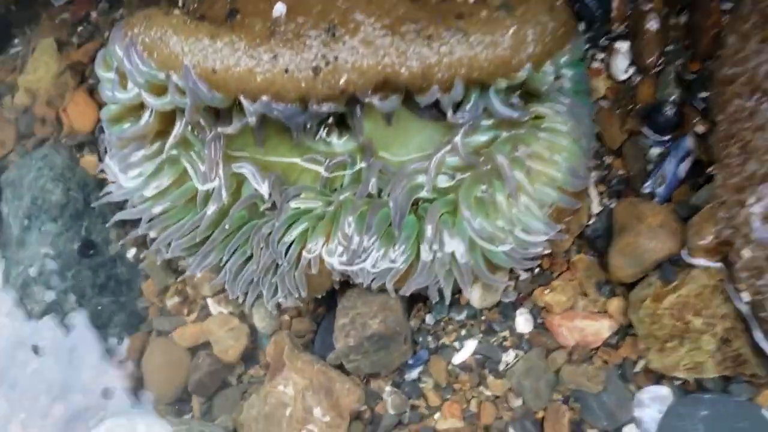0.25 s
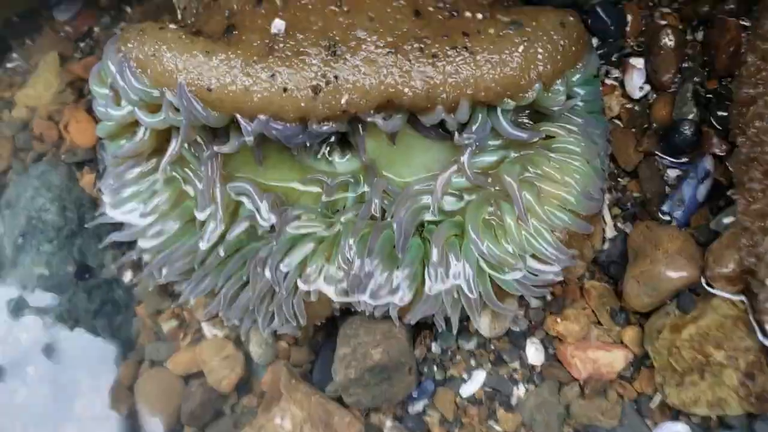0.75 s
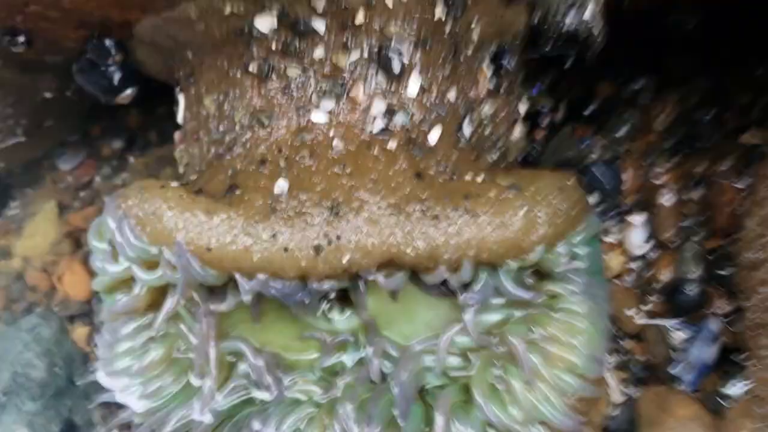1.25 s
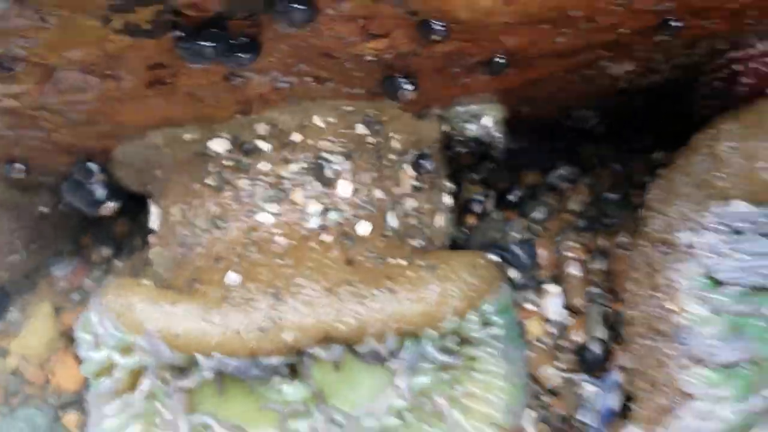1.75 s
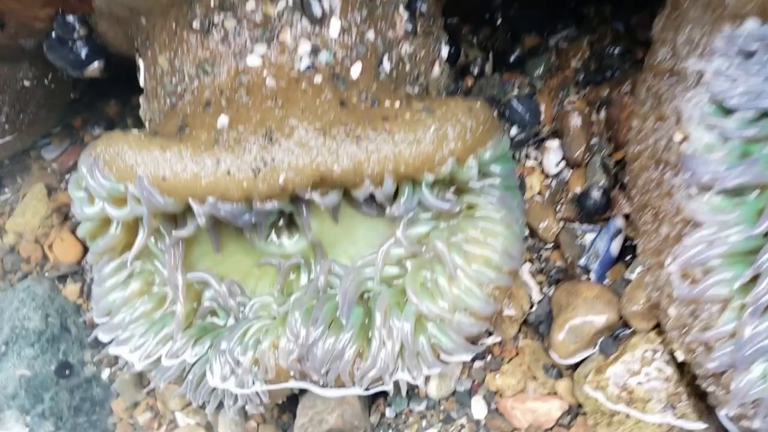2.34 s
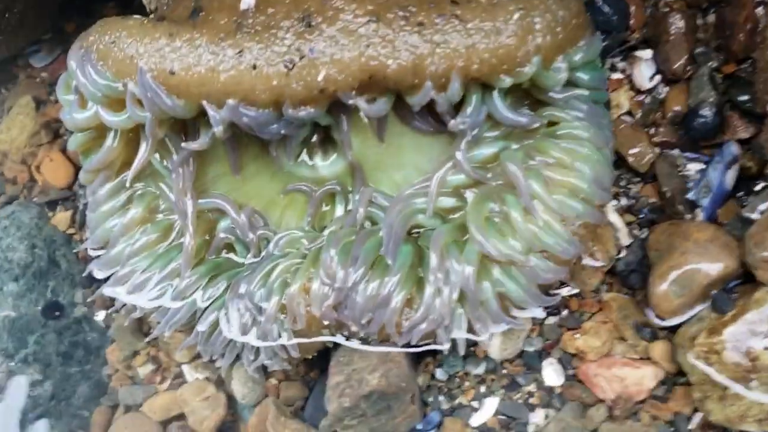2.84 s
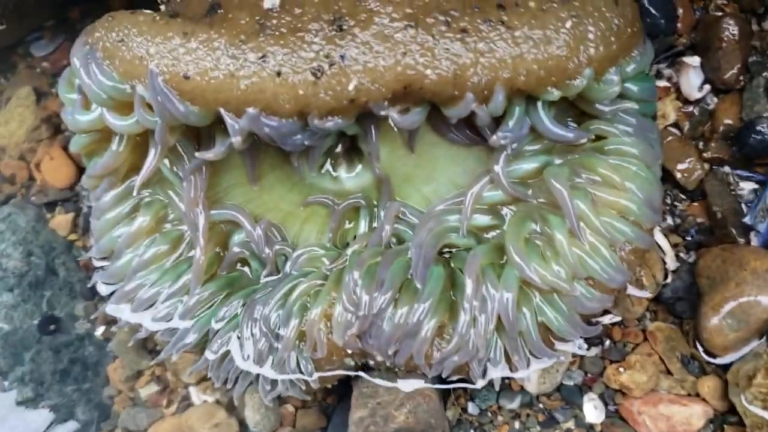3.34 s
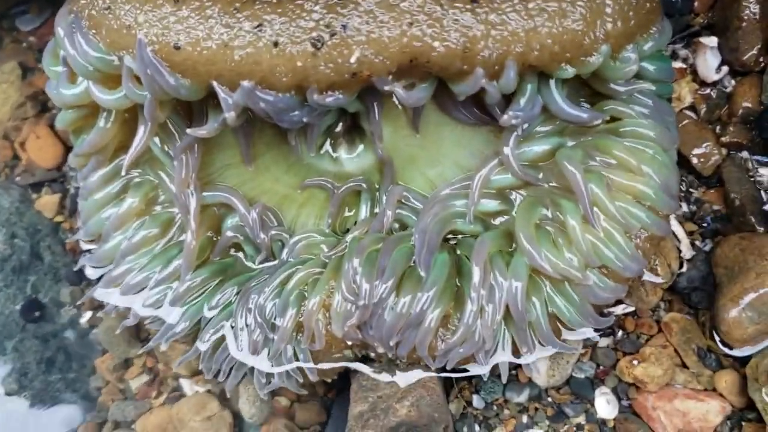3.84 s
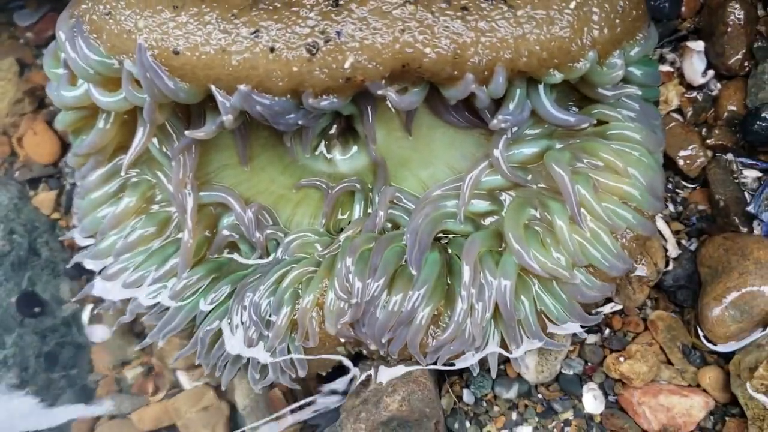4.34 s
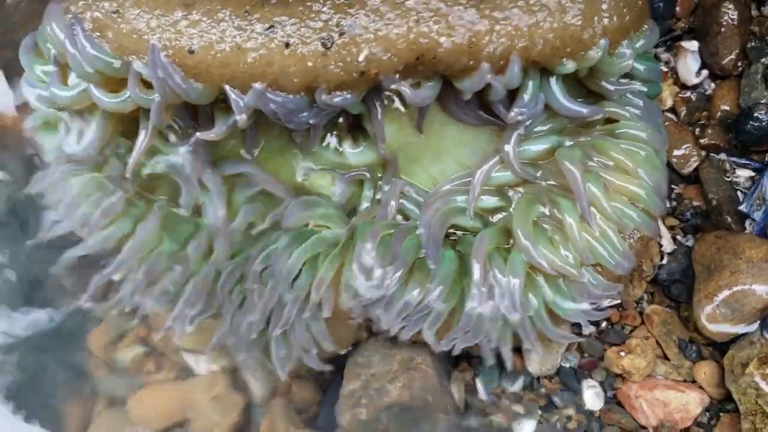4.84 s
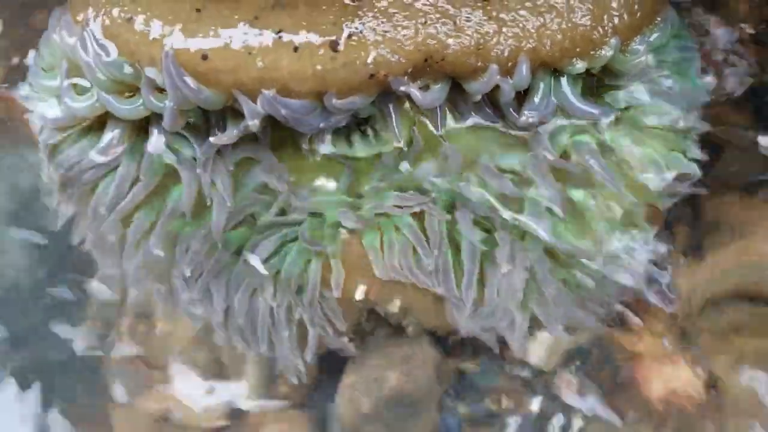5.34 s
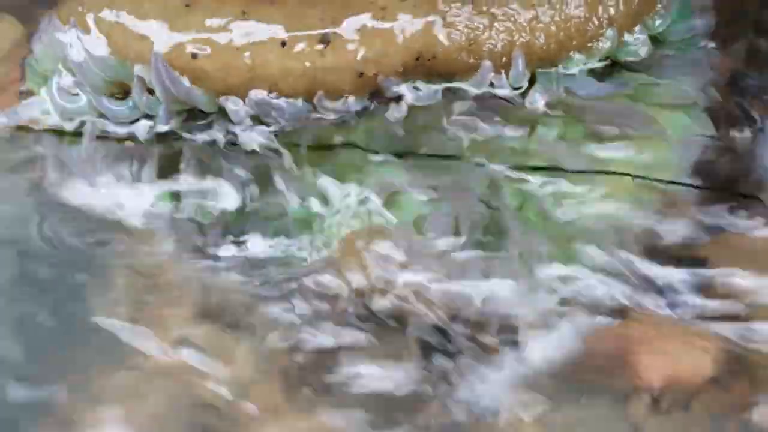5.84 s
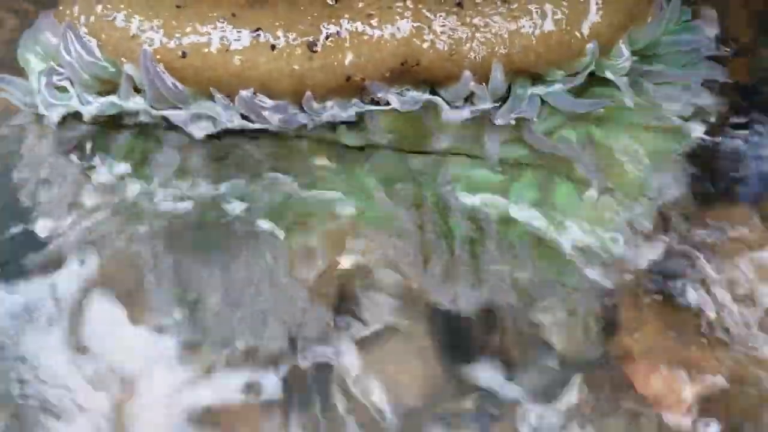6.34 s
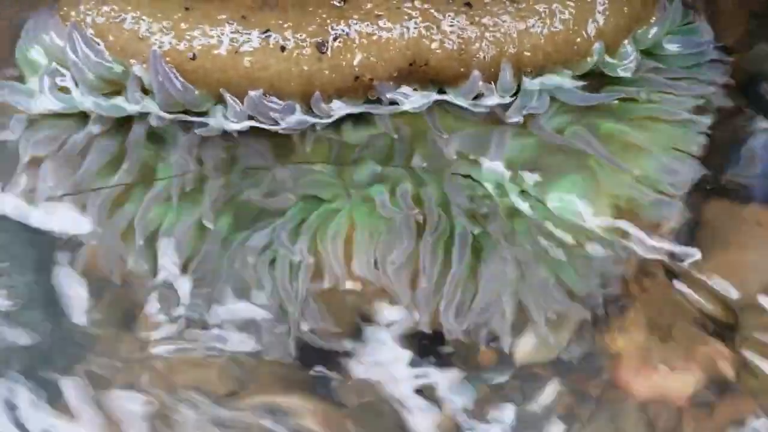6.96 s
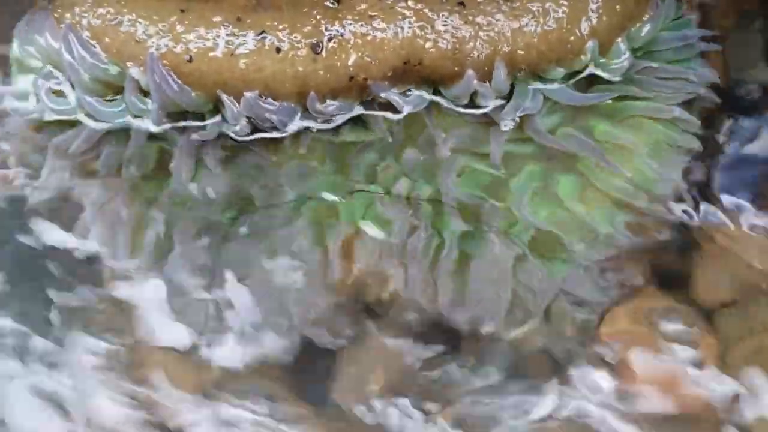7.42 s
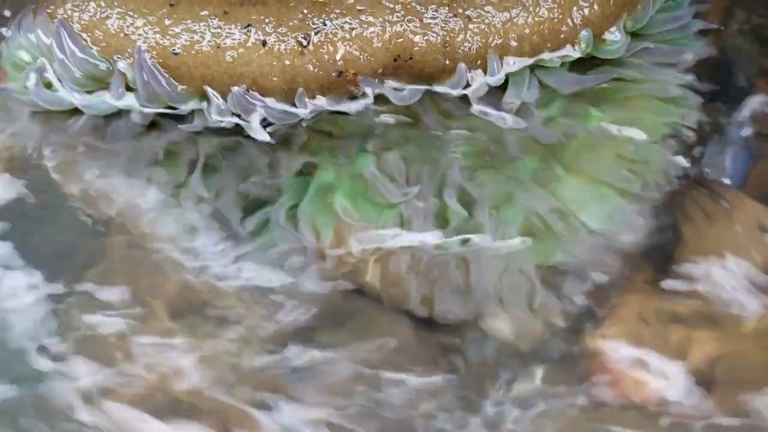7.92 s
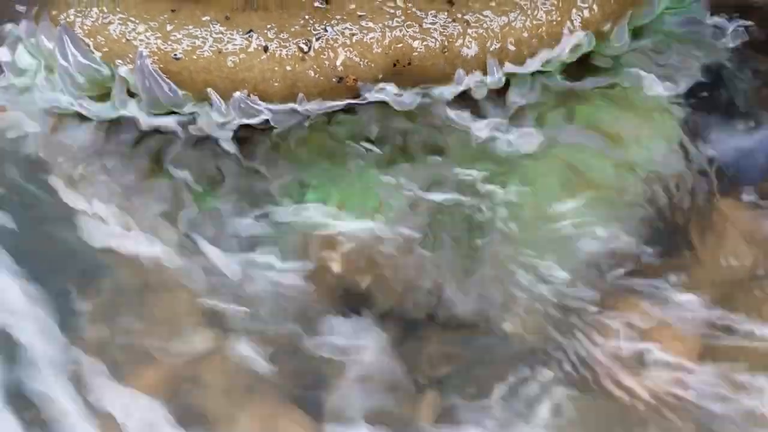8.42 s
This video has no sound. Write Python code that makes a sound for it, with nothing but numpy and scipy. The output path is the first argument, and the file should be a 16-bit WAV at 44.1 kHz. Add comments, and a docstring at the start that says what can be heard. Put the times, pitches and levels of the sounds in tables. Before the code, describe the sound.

Fingers thump and rub the recorder's case above quiet tide pool water before a wave washes in with bubbling, boomy slosh.

```python
"""Rocky tide pool: seawater surges in, heard at the two microphone ports of a hand-held case.
Shaped noise makes roar, wash and spray; a wavering low boom sits in the roar.
Chirped decaying sines make bubbles and gurgle, noise bursts make drops and splashes.
A hand half covers the right port, which sounds dull and hollow.
Fingers knock and rub the case: noise-driven resonances, thumps and hum overload the right port."""
import sys
import numpy as np
from scipy import signal
from scipy.fft import rfft, irfft, next_fast_len
from scipy.io import wavfile
from scipy.ndimage import uniform_filter1d

SR = 44100
rng = np.random.default_rng(int(sys.argv[2]) if len(sys.argv) > 2 else 0)


def transcribe(signal):
    """Save signal, clipped to [-1, 1], as a 16-bit WAV file at the path in sys.argv[1]."""
    frames = np.atleast_2d(signal).T
    limited = np.clip(frames, -1, 1)
    pcm = np.round(limited * 32767).astype(np.int16)
    wavfile.write(sys.argv[1], SR, pcm)


N = 383229


def gain_of(db):
    """Decibels to an amplitude factor."""
    return 10 ** (np.asarray(db) / 20)


def evened(x):
    """Scales to rms 1."""
    return x / np.sqrt(np.mean(x ** 2) + 1e-20)


def read(points, hz):
    """Interpolates a spectrum table on a log-frequency axis."""
    f, value = np.transpose(points)
    return np.interp(np.log(hz + 1), np.log(f + 1), value)


def curve(rows, column, t=None):
    """Interpolates one table column over time."""
    rows = np.array(rows)
    if t is None:
        t = np.arange(N) / SR
    return np.interp(t, rows[:, 0], rows[:, column])


def colour(x, points):
    """Zero-phase filter from an f/Hz, gain/dB table."""
    size = next_fast_len(N)
    gain = gain_of(read(points, np.fft.rfftfreq(size, 1 / SR)))
    return irfft(rfft(x, size) * gain, size)[..., :N]


def resonate(x, hz, width_hz):
    """Two-pole resonance, peak gain 1."""
    return signal.lfilter(*signal.iirpeak(hz, hz / width_hz, SR), x)


def glide_resonate(x, hz, width_hz):
    """Resonance of moving pitch: shift to 0 Hz, two equal poles, shift back; also returns the rotation."""
    turn = np.exp(2j * np.pi * np.cumsum(hz) / SR)
    r = np.exp(-np.pi * width_hz / SR)
    low = signal.lfilter([1], [1, -2 * r, r * r], x / turn)
    return evened((turn * low).real), turn


def add(mix, t_s, sound):
    """Mixes a sound in at t_s, cut at the end."""
    part = mix[..., round(t_s * SR):][..., :sound.shape[-1]]
    part += sound[..., :part.shape[-1]]


def wobble(smooth_s):
    """Twice-smoothed noise, rms 1."""
    size = max(round(smooth_s * SR), 2)
    return evened(uniform_filter1d(uniform_filter1d(rng.standard_normal(N), size), size))


# relative levels of roar, wash and spray; the rise at 2.8-3.15 s belongs to the finger rub:
# t/s, roar level/dB, wash level/dB, spray level/dB
LAYER_LEVELS = [(0, -30.5, -34, -40), (.9, -33.5, -39, -44.5), (1.9, -34.5, -37.5, -44),
                (2.2, -37.5, -37, -42.5), (2.6, -34, -36, -43.5), (2.8, -25, -29.5, -35.5),
                (3.15, -25, -29.5, -40), (3.66, -29, -33, -34), (4.05, -25.5, -21, -23.5),
                (4.5, -20.5, -20.5, -21.5), (4.68, -20.5, -22.5, -26), (4.85, -20.5, -22, -21.5),
                (5.2, -20, -19, -22.5), (5.42, -22.5, -18.5, -17), (5.76, -20, -19.5, -23),
                (6.12, -19.5, -18.5, -16), (6.4, -23, -23, -26), (6.9, -19.5, -21.5, -20.5),
                (7.42, -23, -24.5, -26.5), (7.68, -21.5, -24, -24), (8.15, -21.5, -22, -25),
                (8.69, -21.5, -25.5, -26.5)]
# roar spectrum shape: f/Hz, level/dB
ROAR_SPECTRUM = [(20, -85), (50, -2.5), (100, 3), (148, 4.5), (200, 5), (280, -2.5), (400, -54)]
# resonance of the hollow between the rocks: t/s, f/Hz, level/dB
HOLLOW_BOOM = [(0, 127.9, -4), (3.8, 129.8, -2.5), (4.45, 140.2, 2), (5.05, 152.1, 3.5), (5.35, 162, -0.5),
               (5.7, 140, -12), (6.1, 124, -2.5), (6.4, 124, 1.5), (6.55, 146, -12), (6.95, 147, 0),
               (7.7, 153, -1.5), (7.9, 175, -5), (8.69, 185, -1.5)]
# left bass, weak at first: t/s, gain/dB
LEFT_BASS_GAIN = [(0, -20), (.3, -16), (.45, -23), (1.58, -27), (1.62, -3)]


def roar():
    """Lumpy swell bass plus the boom of the hollow between the rocks, nearly alike at both ports."""
    boom, turn = glide_resonate(rng.standard_normal(N), curve(HOLLOW_BOOM, 1), 34)
    core = np.sin(np.angle(turn) + 0.6 * wobble(0.08))  # steadier, phase wavers
    boom = 0.5 * boom + 1.1 * core
    swell, other = evened(colour(rng.standard_normal((2, N)), ROAR_SPECTRUM))
    bass = swell + boom * gain_of(curve(HOLLOW_BOOM, 2))
    left = bass * gain_of(curve(LEFT_BASS_GAIN, 1))
    right = gain_of(3.1) * (0.96 * bass + 0.3 * other)
    return np.array([left, right]) * gain_of(curve(LAYER_LEVELS, 1) - 2.0 + 1.44 * wobble(0.04))


# left-right likeness of the noise: f/Hz, correlation/1
LIKENESS = [(300, 0.75), (430, 0.52), (520, 0.99), (620, 0.036), (1000, 0.42), (1300, 0.34), (1600, 0.15)]
# phase lag of the right port: f/Hz, phase/rad
PORT_LAG = [(300, -1), (500, 2.5), (700, 3.5), (900, 5.5), (1300, 4), (2200, 7.5)]


def sheet(spectrum, column, level_db, patchy_db, flicker_db, dulling, pivot_hz):
    """Random short-time spectra with drifting patches and a flicker shared by all bins."""
    frames, hz = N // 128 + 5, np.fft.rfftfreq(512, 1 / SR)
    a, b, c, d, patches = rng.standard_normal((frames, 257, 5)).T
    patches = evened(uniform_filter1d(uniform_filter1d(patches, 6, 0), 14, 1))
    flicker = evened(uniform_filter1d(rng.standard_normal(frames), 5))
    same = np.clip(read(LIKENESS, hz), -1, 1)[:, None]
    lag = np.exp(-1j * read(PORT_LAG, hz))[:, None]
    left = a + 1j * b
    right = same * left * lag + np.sqrt(1 - same ** 2) * (c + 1j * d)
    layer_db = curve(LAYER_LEVELS, column, np.arange(frames) * 128 / SR)
    tilt_db = np.outer(dulling * np.log2(hz / pivot_hz + 0.5), layer_db + 24)  # duller at low level
    shape_db = tilt_db + read(spectrum, hz)[:, None]
    z = np.array([left, right]) * gain_of(shape_db + patchy_db * patches + flicker_db * flicker)
    noise = signal.istft(z, nperseg=512, noverlap=384)[1][:, :N]
    return evened(noise) * gain_of(curve(LAYER_LEVELS, column) + level_db)


def bubble(hz, length_s, rise):
    """An air pocket rings and its pitch climbs as it nears the surface."""
    t = np.arange(round(length_s * SR)) / SR
    fade = np.exp(-(t / (0.16 * length_s)) ** 0.83)
    attack = np.minimum(t * hz / 3.2, 1)
    return np.sin(2 * np.pi * hz * (t + rise * t ** 2 / length_s)) * fade * attack


def splash(hz, t60_s, wide=0.36):
    """A drop bursts: wideband decaying noise with a resonant core, peak 1."""
    t = np.arange(round(t60_s * SR)) / SR
    burst = rng.standard_normal(len(t)) * gain_of(-60 * t / t60_s)
    core_hz = min(hz, 15000)
    sound = 0.75 * burst + 1.95 * resonate(burst, core_hz, core_hz * wide / 2)
    return sound / abs(sound).max()


def grains(shapes, column, per_s, spread_db, level_db):
    """Sparse, clumped, uneven clicks each set off a random shape; levels swing more than the layer's."""
    clumps = np.exp(0.8 * wobble(0.02))
    fires = rng.random(N) < per_s * clumps / SR
    size = gain_of(spread_db * np.minimum(rng.exponential(1, N), 3.5)) * fires
    which, out = rng.integers(0, len(shapes), N), np.zeros(N)
    for at in np.flatnonzero(size):
        add(out, at / SR, size[at] * shapes[which[at]])
    layer_db = curve(LAYER_LEVELS, column)
    return evened(out) * gain_of(layer_db + 0.35 * (layer_db + 16.0) + level_db)


def rocks(x, wet_db, t60_s):
    """Short scatter off the pool walls: sparse random taps, different for each port."""
    t = np.arange(4000) / SR
    signs = rng.choice([-1., 1.], (2, 4000))
    taps = signs * (rng.random((2, 4000)) < 0.05) * gain_of(-60 * t / t60_s)
    taps *= gain_of(wet_db) / np.linalg.norm(taps, axis=1, keepdims=True)
    taps[0, 0], taps[1, 26] = 1, 1  # right port a little farther from the water
    return signal.fftconvolve(x[None], taps, axes=1)[:, :N]


# wash spectrum shape: f/Hz, level/dB
WASH_SPECTRUM = [(200, -7.5), (300, -1.5), (400, 7), (520, 0.5), (700, -1), (1000, -3.5), (1600, -10.5),
                 (2500, -7.5), (4000, -24), (6000, -27.5)]
# spray spectrum shape: f/Hz, level/dB
SPRAY_SPECTRUM = [(1500, -2.5), (2800, -1), (4000, -1.5), (6000, -3), (9000, -2.5), (16300, -8)]
# single splashes before wall scatter and port colour: t/s, level/dB, f/Hz
SINGLE_SPLASHES = [(0.075, -15.5, 3100), (1.784, -26, 6060), (1.798, -26, 4930), (1.849, -27, 4220),
                   (2.347, -12, 4930), (2.361, -27, 3500), (2.388, -24, 4520), (2.433, -23, 12200),
                   (2.499, -19, 11500), (3.568, -14, 8450), (3.769, -8, 4930), (4.0, -1.5, 5140),
                   (4.016, -3.5, 2970), (4.098, -4.5, 4000), (4.106, -5, 2680), (4.656, -7, 3060),
                   (4.786, -3, 2770), (4.836, 5, 2580), (4.867, -8, 3140), (5.176, -3, 3600),
                   (5.28, -8, 8000), (5.295, -0.5, 11400), (5.331, 9, 2570), (5.339, 2, 4000),
                   (5.349, 4, 2980), (5.37, 4.5, 2550), (5.397, -7, 8800), (5.461, -5, 8190),
                   (5.487, 0.5, 3280), (5.606, 6.5, 2720), (5.738, 0, 2520), (5.867, 4, 3700),
                   (5.901, .5, 2860), (6.004, 5.5, 4870), (6.048, 2, 2550), (6.209, 0, 2577),
                   (6.272, -5, 4360), (6.447, -6, 2550), (6.556, -4.5, 3900), (6.583, -3, 11700),
                   (6.637, 0.5, 7860), (6.671, -3, 2530), (6.766, -4.5, 3120), (6.841, 5, 4660),
                   (6.893, -4.5, 6400), (7.058, 0, 3040), (7.309, -7.5, 4500), (7.614, 0, 4070),
                   (7.668, -8, 4720), (7.715, 2.5, 6400), (7.764, -8, 4070), (7.847, -3, 2660),
                   (7.881, -3.5, 4370), (7.916, -10, 4630), (7.95, -7, 11400), (7.974, -7, 2490),
                   (8.017, -0.5, 2520), (8.05, -9, 4250), (8.075, 0.5, 2470), (8.096, 0, 4830),
                   (8.125, -2, 4200), (8.151, -1.5, 4950), (8.178, -12, 11500), (8.222, 1, 2400),
                   (8.265, -3.5, 2925), (8.322, -1, 2550), (8.452, -3, 5460)]
# treble colour of the ports: f/Hz, gain/dB
PORT_TREBLE = [(1200, -20), (2400, 0.5), (5500, -0.5), (6800, -3.5), (8500, 0.5), (10000, -5.5),
               (11800, 0.5), (14000, -9), (16300, -8)]
# hollow under the hand, right port: f/Hz, gain/dB
CUPPED_PORT = [(60, -2.5), (260, 7), (500, 1.5), (700, 11), (1000, 6.5), (1700, 3), (2200, 2),
               (2600, -12.5), (3400, -19), (4400, -29), (7000, -48)]
SPLASH_T60_S = 0.027


def water():
    """Wash and spray noise with many small bubbles and drops, plus the single splashes."""
    low = [bubble(hz, 18 / hz, 0.247) for hz in np.geomspace(450, 1300, 30)]
    high = [bubble(hz, 32 / hz, 0.285) * (hz / 2000) ** 0.5 for hz in np.geomspace(1100, 5500, 60)]
    clear = [bubble(hz, 45 / hz, 0.2) for hz in np.geomspace(1000, 5000, 60)]
    coarse = [splash(hz, 0.015) for hz in np.geomspace(3000, 13500, 60)]
    fine = [splash(hz, 0.0046) for hz in np.geomspace(7500, 14000, 30)]

    gurgle = grains(low, column=2, per_s=120, spread_db=3.5, level_db=-10.0)
    trickle = grains(high, column=3, per_s=480, spread_db=3.5, level_db=-6.0)
    trickle += grains(clear, column=3, per_s=90, spread_db=4.5, level_db=-6.5)
    drops = grains(coarse, column=3, per_s=120, spread_db=3.5, level_db=-5.5)
    drops += grains(fine, column=3, per_s=110, spread_db=5.0, level_db=-5.5)
    for t_s, db, hz in SINGLE_SPLASHES:
        add(drops, t_s, gain_of(db) * splash(hz, SPLASH_T60_S))

    spray = sheet(SPRAY_SPECTRUM, column=3, level_db=-7, patchy_db=3.0, flicker_db=0.0,
                  dulling=0.065, pivot_hz=5000)
    wash = sheet(WASH_SPECTRUM, column=2, level_db=-3, patchy_db=2.5, flicker_db=1.0,
                 dulling=0.22, pivot_hz=820)
    treble = colour(spray + rocks(drops, wet_db=-9, t60_s=0.028), PORT_TREBLE)
    left, right = wash + rocks(gurgle + trickle, wet_db=-1, t60_s=0.062) + treble
    return np.array([left, colour(right, CUPPED_PORT)])


# large single bubbles, ring at the right port: t/s, level/dB, f/Hz, length/s
LARGE_BUBBLES = [(3.77, -12, 1295, 0.011), (4.038, -10.5, 1410, .017), (4.047, -15, 517, 0.026),
                 (4.071, -12, 1450, .014), (4.195, -9.5, 1338, 0.013), (4.221, -13, 1500, .012),
                 (4.835, 4.5, 916, 0.0082), (4.836, 1, 2281, 0.0065), (5.281, -7, 467.3, 0.016),
                 (5.317, -1.5, 551, 0.025), (5.329, 5.5, 1680, 0.0047), (5.525, -10, 1200, 0.015),
                 (5.593, -10.5, 2710, .008), (5.606, 1.5, 949, 0.02), (5.659, -11, 1020, 0.019),
                 (5.864, 0, 1044, 0.0055), (5.92, -7.5, 696, .033), (5.98, -9.5, 827, .016),
                 (5.999, -13, 1600, .007), (6.01, -8, 483, 0.015), (6.106, -9, 687, 0.034),
                 (6.202, -14, 2102, .008), (6.214, -5, 868, 0.026), (6.25, 2, 968, 0.015),
                 (6.282, -10, 1595, .01), (6.318, -9, 694, 0.034), (6.418, -13, 1090, 0.024),
                 (6.789, -12, 1620, .006), (6.594, -14, 1650, .009), (6.893, -12, 860, .012),
                 (6.917, -13, 1250, .012), (6.982, -6.5, 824, 0.038), (7.21, -11, 1650, .012),
                 (7.284, -6.5, 806, 0.013), (7.315, -14, 1008, .018), (7.504, -14.5, 1373, .02),
                 (7.904, -12, 1940, .011), (7.956, -12, 1270, .02), (7.98, -15, 2340, 0.0071),
                 (8.151, -16, 470, .018), (8.4, -6, 1580, 0.0091), (8.468, -8, 638, 0.017),
                 (8.502, 5, 655, 0.016), (8.502, -6, 1970, .01), (8.659, 2, 600, 0.015)]
LEFT_DB, LEFT_SHARE = -19, 0.46  # bursts near the right port: left gets LEFT_DB + share of the level/dB


def bubbles():
    """Large bubbles ring, burst with a noise slap and set off a quieter neighbour."""
    out = np.zeros((2, N))
    chances = rng.random((len(LARGE_BUBBLES), 3))
    for (t_s, db, hz, length_s), (climb, delay, pitch) in zip(LARGE_BUBBLES, chances):
        t = np.arange(round(2 * length_s * SR)) / SR
        tone = np.sin(2 * np.pi * hz * (t + 0.08 * climb * t ** 2 / length_s))
        ring = tone * np.exp(-(t / length_s) ** 3) * np.minimum(t * hz / 1.5, 1)
        rough = 1 + 0.59 * evened(uniform_filter1d(rng.standard_normal(len(t)), 200))
        slap = rng.standard_normal(len(t)) * gain_of(-60 * t / 0.011)
        slap = resonate(resonate(slap, hz, hz), hz * 1.05, hz)
        side = gain_of([[LEFT_DB + LEFT_SHARE * db], [db]])
        neighbour = bubble(hz * (0.91 + 0.5 * pitch), 1.94 * length_s, 0.081)
        add(out, t_s, side * (ring * rough + 4.4 * slap))
        add(out, t_s + 0.022 * delay, side * 0.45 * neighbour)
    # the hand swallows the treble
    out[1] = signal.sosfilt(signal.butter(6, 2900, fs=SR, output="sos"), out[1])
    return out


# finger blows: t/s, blow level/dB, hardness/0-1, length/s, thump level/dB
FINGER_BLOWS = [(0.076, -6, 0.58, 0.02, -22), (.371, 14.5, 0.71, 0.035, -9), (.384, 16.5, .75, 0.034, -1.5),
                (.394, 4.5, 0.7, 0.024, -12), (.4, 14, 0.67, 0.029, -6.5), (.474, 15.5, 0.75, 0.026, -5),
                (0.502, -8, 0.16, .016, -13), (.539, -6.5, 0.48, 0.014, -28), (.56, -4, .07, .028, -8),
                (0.597, -12, 0.5, .027, -22), (.633, 15.5, 0.68, 0.027, -22), (.673, 20, 0.62, 0.025, -10),
                (.684, 14, 0.32, 0.02, 2.5), (.766, 0.5, 0, 0.087, 4.5), (.811, 12.5, 0.65, .024, -2),
                (.822, -2.5, 0, 0.027, -1.5), (0.862, 1, 0.26, 0.018, -15), (.868, 12, 0.69, 0.033, -3),
                (0.936, -2.5, 0.33, 0.017, -6), (.996, -12, 0, 0.011, -3.5), (1.021, -6, 0, 0.021, 1),
                (1.026, 10, 0.48, 0.036, -6), (1.15, -12, 0.17, 0.034, -1.5),
                (1.155, 11.5, 0.34, 0.033, -14), (1.21, -37, .1, .02, -11.5), (1.288, 1.5, 0.15, 0.021, -4),
                (1.294, 15.5, 0.4, 0.084, -5), (1.312, 10, 0, .067, -5), (1.319, 1, 0.1, 0.074, -4),
                (1.337, -9, 0.63, 0.021, -6), (1.358, -7.5, 0.3, 0.028, -19), (1.41, -23, 0, .014, -10.5),
                (1.466, 12, 0.55, 0.036, -0.5), (1.762, -9.5, 0.1, .03, -20), (1.879, -6, 0.54, 0.019, -20),
                (2.733, 15.5, 0.02, 0.046, -9), (2.747, 7, 0, 0.13, 7.5), (2.762, 7.5, 0.06, 0.069, 9),
                (2.788, 10.5, 0, 0.043, 6), (2.806, 7, 0.44, 0.029, -7), (2.82, 10, 0.16, 0.041, 1),
                (2.834, 10, 0.1, 0.023, -2), (2.843, 10.5, 0.2, 0.025, -4), (2.863, 3.5, 0, 0.035, -3),
                (2.874, -4, 0.07, 0.024, 3)]
# case modes before the grip shift: f/Hz, width/Hz, soft-blow level/dB, hard-blow level/dB
CASE_MODES = [(605, 600, 36.5, -25), (873, 180, -14.5, 3.5), (1635, 390, -31.5, 13), (2430, 400, -34, -50),
              (860, 65, -26, -22), (1800, 52, -37, -19)]
LEAK_DB = -28  # blow leak to the left, before the hardness weight


def knocks():
    """A friction burst rings the case and trapped air thumps; the left port gets a faint tick or bump."""
    out, t = np.zeros((2, N)), np.arange(4400) / SR
    for t_s, db, hard, length_s, thump_db in FINGER_BLOWS:
        creak = 0.049 * gain_of(-60 * t / 0.086)  # faint tail
        burst = rng.standard_normal(len(t)) * (np.exp(-(t / (0.13 * length_s)) ** 2) + creak)
        grip = rng.uniform(0.89, 1.03)  # shifts the modes
        ring = np.zeros(len(t))
        for hz, width_hz, soft_db, hard_db in CASE_MODES:
            mode_db = soft_db + hard * (hard_db - soft_db)
            ring += gain_of(mode_db) * resonate(burst, hz * grip, width_hz)
        # soft blows are dull
        ring = signal.sosfilt(signal.butter(6, 950 + 2100 * hard, fs=SR, output="sos"), ring)

        thump_hz = 70 + 120 * rng.uniform(0.58, 1.81) * np.exp(-t / 0.014)  # sags
        thump = np.sin(2 * np.pi * np.cumsum(thump_hz) / SR)
        thump = thump * gain_of(-60 * t / 0.087) * np.minimum(t / 0.0076, 1)
        push = np.sin(2 * np.pi * 60 * t) * gain_of(-60 * t / 0.16)  # slow push on the diaphragm
        thump = thump + 0.25 * rng.choice([-1, 1]) * push

        tick = rng.standard_normal(len(t)) * gain_of(-60 * t / (1.5 * length_s))
        tick = resonate(tick, 3200 * rng.uniform(0.9, 1.2), 1300)
        bump = resonate(resonate(burst, 380, 120), 380, 120)
        leak = hard ** 2 * tick / abs(tick).max() + 0.51 * (1 - hard) ** 2 * bump / abs(bump).max()
        right = gain_of(db) * ring / abs(ring).max() + gain_of(thump_db) * thump
        add(out, t_s, np.array([gain_of(db + LEAK_DB) * leak, right]))
    return out


# a finger presses hard in two pushes, then drags on more weakly and unevenly; right port, relative:
# t/s, hum level/dB, scrape level/dB
FINGER_RUB = [(2.72, -74, -60), (2.735, 7, 0.5), (2.775, -6, -18), (2.8, 3.5, -3), (2.875, 0, -12),
              (2.91, -25, -19), (3.0, -25, -16), (3.07, -16, -24.5), (3.14, -17, -18.5),
              (3.28, -14.5, -16.5), (3.44, -17.5, -19), (3.47, -29, -41)]
# jerks of the finger, added to the hum: t/s, level/dB
FINGER_JERKS = [(2.947, -4.5), (3.292, -2), (3.395, -25), (3.433, -9)]
JERK_S = 0.021


def rub():
    """Dragging skin drives the low hum of the case and two scraping bands."""
    noise, t = rng.standard_normal((2, N)), np.arange(N) / SR
    scrape_db = curve(FINGER_RUB, 2)
    press = gain_of(curve(FINGER_RUB, 1))
    for t_s, db in FINGER_JERKS:
        press += gain_of(db) * np.exp(-((t - t_s) / JERK_S) ** 2)
    wavering = np.sin(2 * np.pi * np.cumsum(190 + 18 * wobble(0.0194)) / SR)
    hum = (wavering + 0.5 * evened(resonate(resonate(noise[0], 153, 100), 145, 120))) * press

    upper_hz = np.clip(980 + 25 * (scrape_db + 17), 700, 1050)  # climbs as the scrape gets louder
    upper, _ = glide_resonate(noise[1], upper_hz, 190)
    scrape = evened(resonate(resonate(noise[1], 640, 160), 623, 160)) + 0.9 * upper
    scrape = evened(signal.lfilter(*signal.butter(6, 1200, fs=SR), scrape))
    scrape = scrape * gain_of(scrape_db + 0.89 * wobble(0.011))
    touching = (t > FINGER_RUB[0][0]) * (t < FINGER_RUB[-1][0])
    return touching * (hum + scrape) * gain_of([[-38], [0]])


def scene():
    """Sums sea and handling at the two ports."""
    return roar() + water() + bubbles() + knocks() + rub()


EDGE_HZ = 15900


def record(dry):
    """Faint preamplifier hiss, hard overload at full scale, then the band limit."""
    hiss = gain_of(-89) * rng.standard_normal((2, N))
    clipped = np.clip(dry + hiss, -1, 1)
    band = signal.firwin(511, EDGE_HZ, window=("kaiser", 9), fs=SR)
    return np.clip(signal.oaconvolve(clipped, band[None], "same"), -1, 1)


dry = scene()
out = record(dry)
transcribe(out)
```